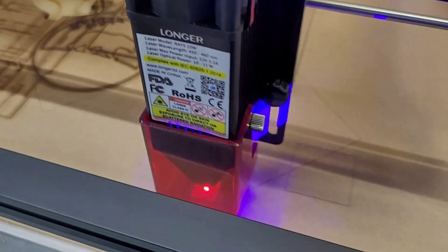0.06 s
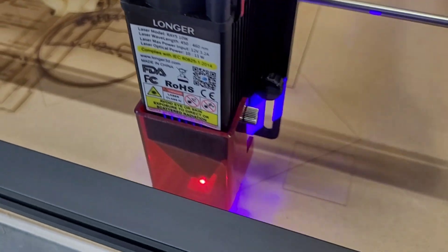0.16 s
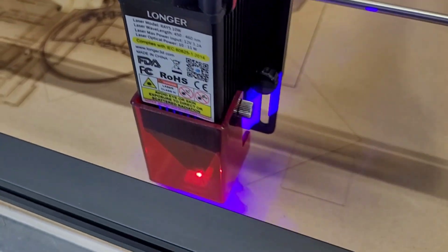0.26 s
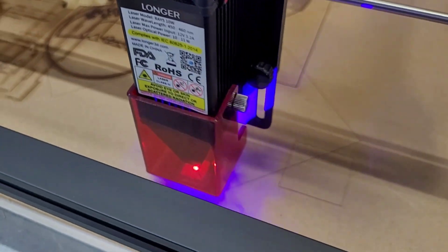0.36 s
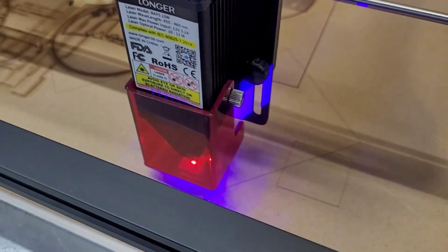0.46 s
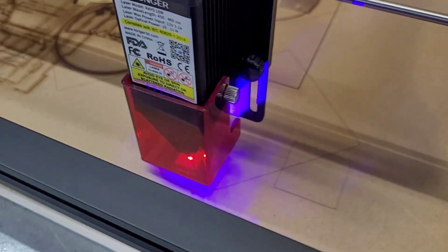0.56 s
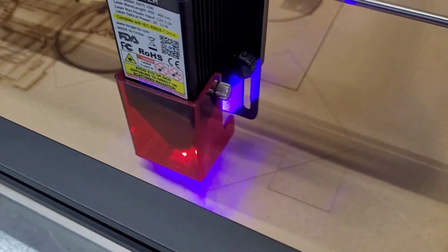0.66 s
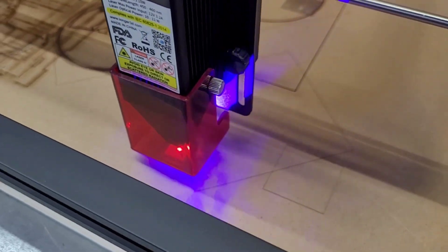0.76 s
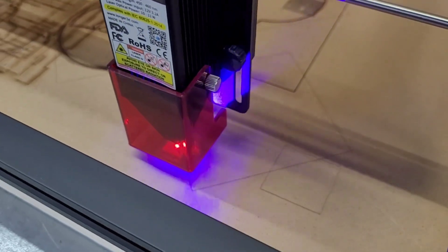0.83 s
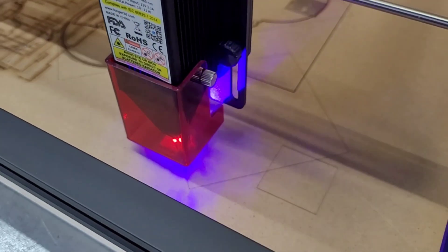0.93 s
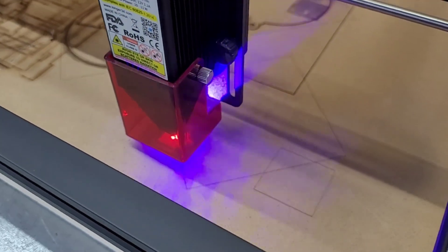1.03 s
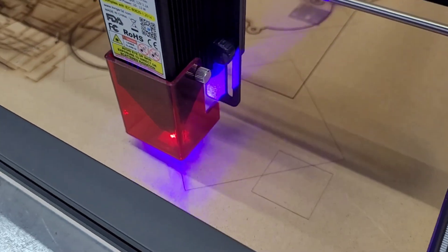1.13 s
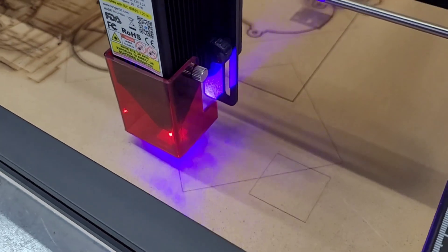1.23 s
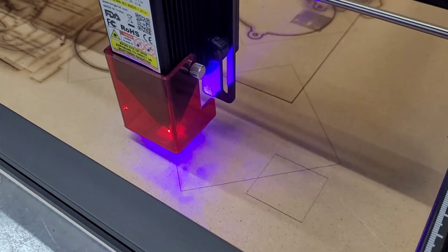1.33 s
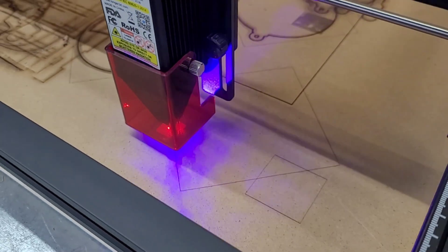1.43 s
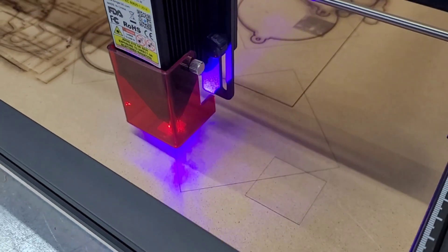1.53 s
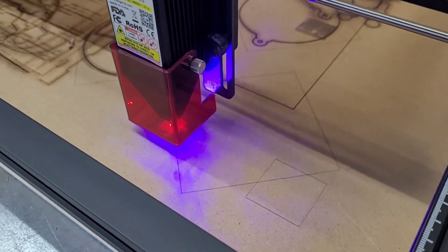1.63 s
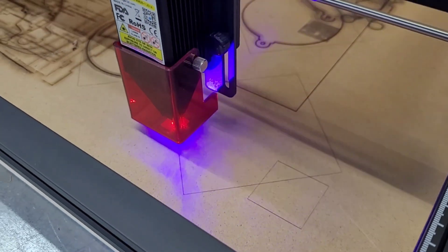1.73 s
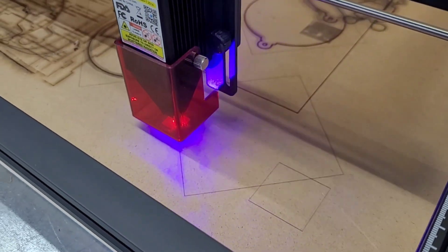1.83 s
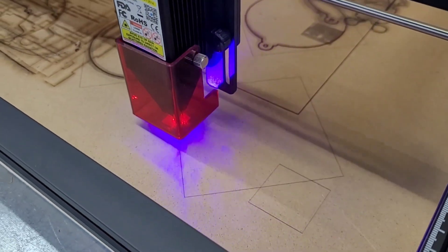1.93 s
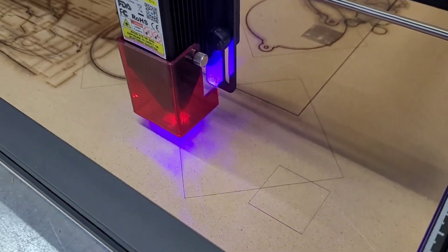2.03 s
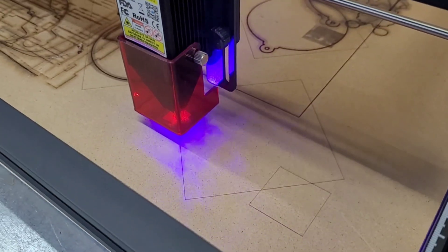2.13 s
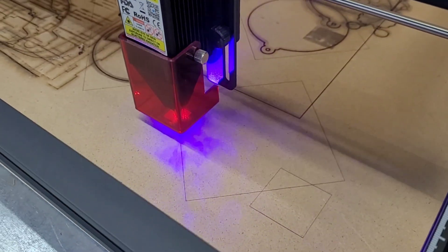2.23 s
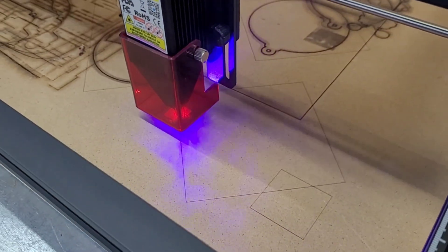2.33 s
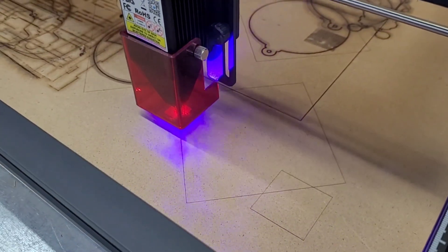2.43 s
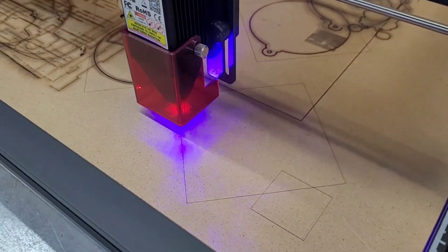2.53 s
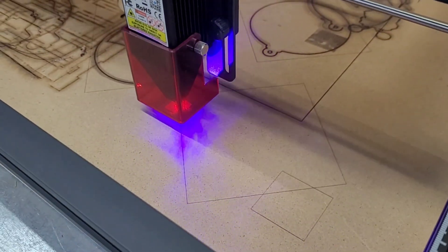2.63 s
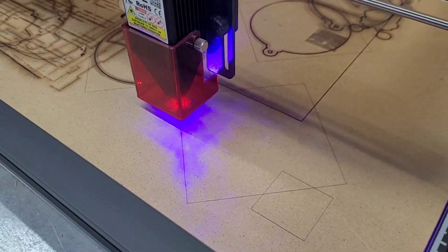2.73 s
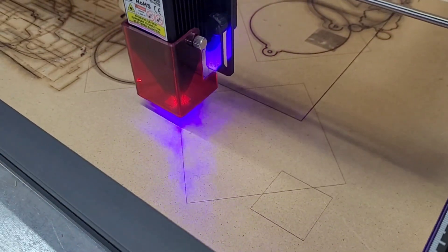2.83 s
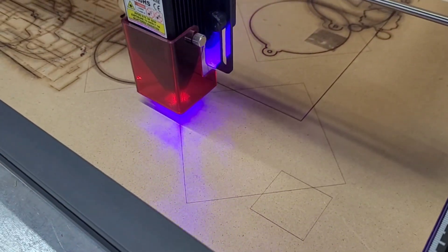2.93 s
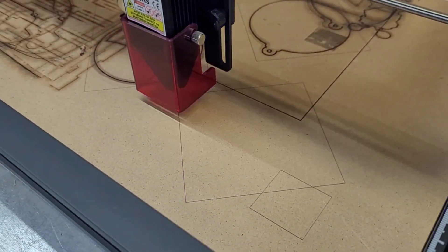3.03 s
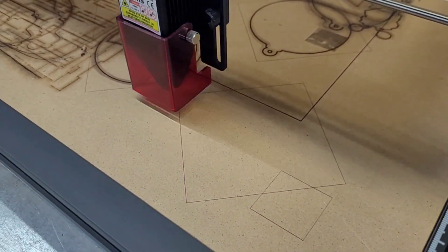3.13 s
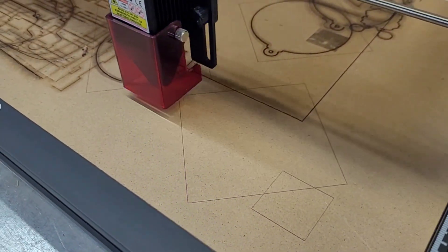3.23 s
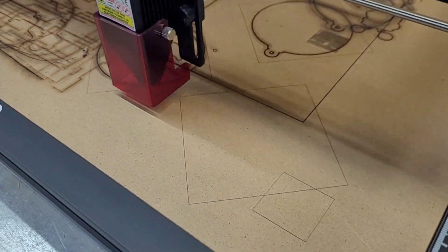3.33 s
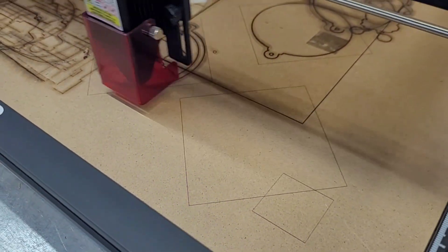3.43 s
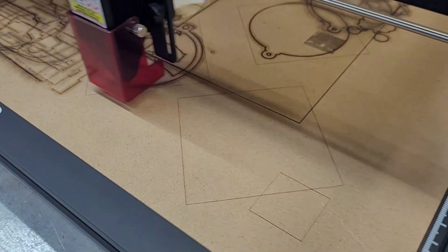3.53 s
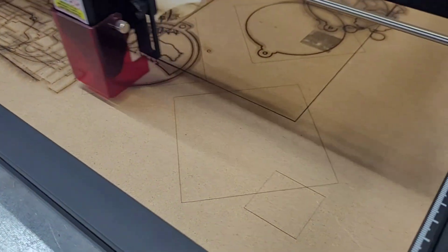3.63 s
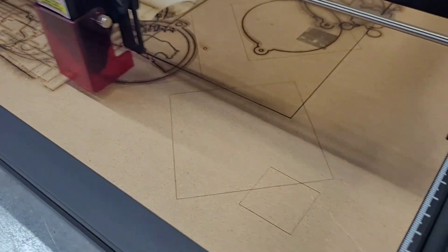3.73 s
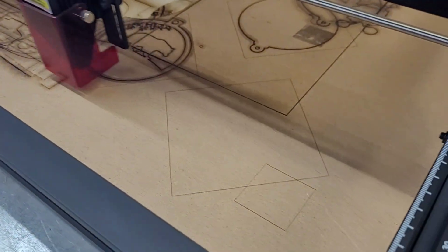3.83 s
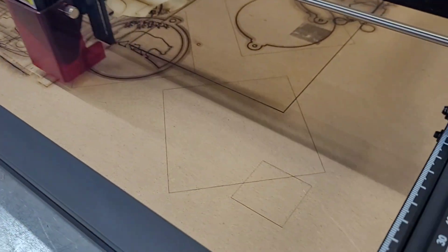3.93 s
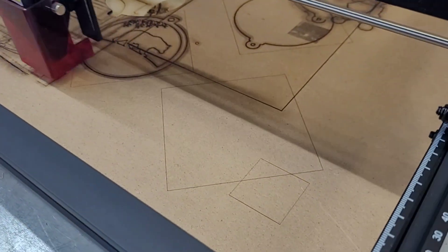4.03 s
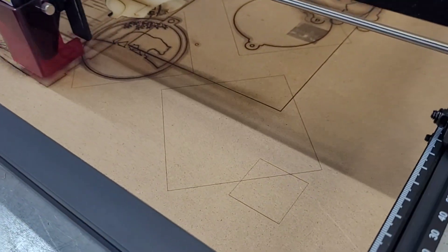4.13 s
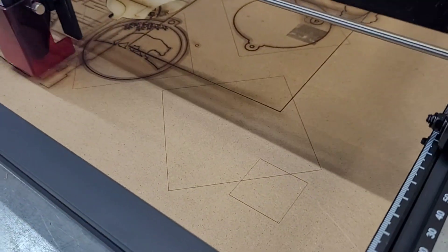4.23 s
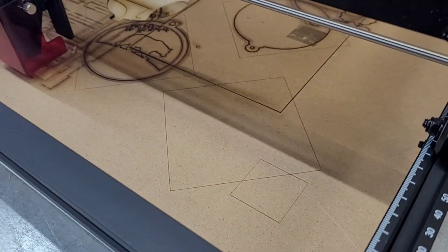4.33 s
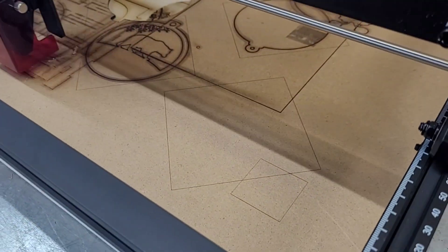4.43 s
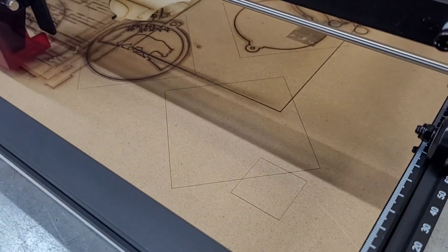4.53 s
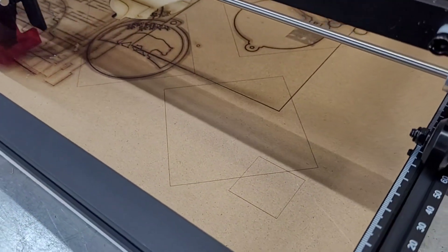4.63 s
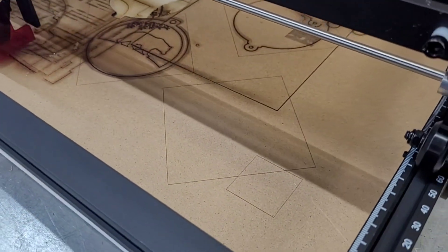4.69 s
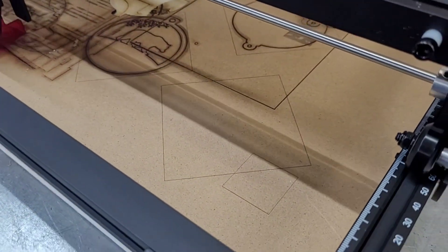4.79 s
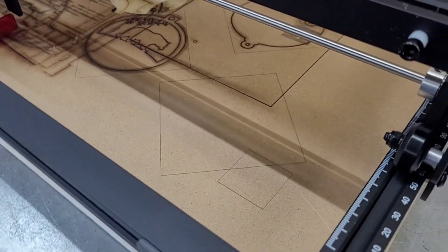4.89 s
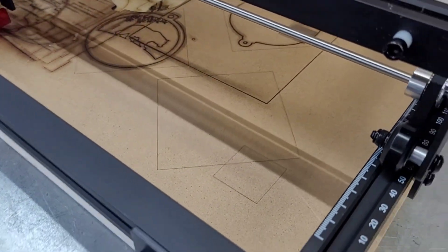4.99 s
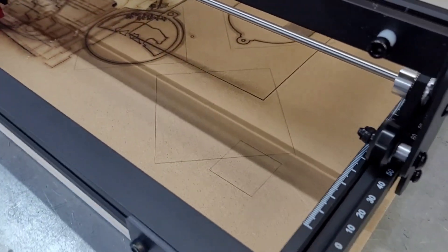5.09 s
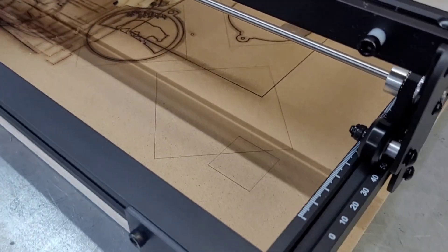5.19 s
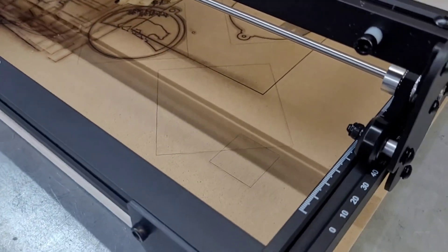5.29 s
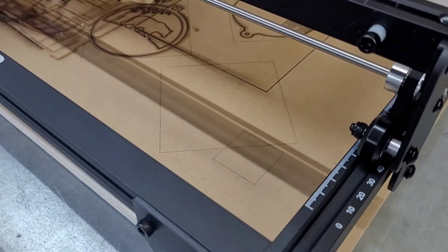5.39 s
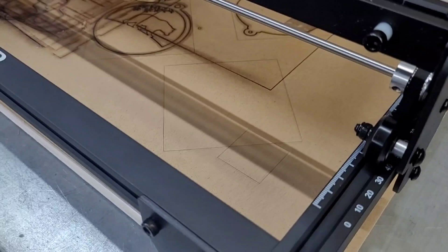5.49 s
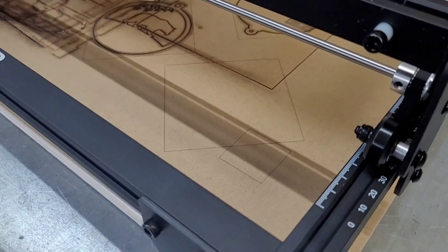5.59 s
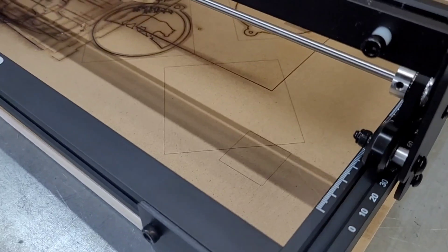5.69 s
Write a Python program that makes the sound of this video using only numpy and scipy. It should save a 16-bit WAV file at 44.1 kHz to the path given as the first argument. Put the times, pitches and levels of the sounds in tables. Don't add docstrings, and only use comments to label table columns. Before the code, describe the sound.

From 0 to 3.1 seconds a small laser engraver cuts wood very close to the microphones. A loud, steady, piercing whine sits around 1 kHz with strong overtones at 2 and 3 kHz, grainy and buzzing, slightly stronger at the start with brief flares in the first third of a second. Burning hiss, fan rush and two closely tuned motors singing near 1.7 kHz surround it; the tone shifts subtly between left and right. A dull knock lands at 1.8. At 3.1 the whine cuts off abruptly. Between 3.1 and 3.4 the carriage brakes and reverses: a clunk with a dry click, a tick and rapid gliding motor chirps. Afterwards, far quieter, a low hum with a thin motor tone and airy friction rush continues, its rush gently fading. Small clicks come at 4.9, 5.08 and 5.13, a low knock and sharp tick near 5.6, and a brief downward motor slur at 5.7.

```python
import sys
import numpy as np
from scipy import signal
from scipy.fft import rfft, irfft, next_fast_len
from scipy.io import wavfile

SR = 44100
rng = np.random.default_rng(int(sys.argv[2]) if len(sys.argv) > 2 else 0)


def elevation(decibels):
    levels = np.asarray(decibels, float)
    return 10 ** (levels / 20)


def store_wav(level_fs):
    pcm = np.round(np.clip(np.atleast_2d(level_fs), -1, 1) * 32767)
    wavfile.write(sys.argv[1], SR, pcm.T.astype(np.int16))


N = 253575
T = np.arange(N) / SR

PULSE_HZ = 1001.53
BEAM_OFF_S, FULL_SPEED_S = 3.11, 3.36

# frequency in Hz, left level in dB, right level in dB, left phase lead in rad.
MAINS_TONES = [(119.8, -64, -63, 0.2), (240.2, -62, -61, 0.0)]
# frequency in Hz, left dB, right dB, left lead in rad.
CUT_MACHINE_TONES = [(53.2, -73, -67, 0.4), (105.6, -61, -63, 0.2), (212.6, -65, -62, -0.2),
                     (316.9, -48, -51, 0.2), (345.2, -59, -64, 0.4), (493.9, -62, -69, 0.6),
                     (640.6, -57, -53, 0.5), (1604.9, -60, -67, -1.1), (1922.5, -53, -58, 1.8),
                     (3382.1, -59, -66, 1.1), (3403.6, -59, -70, 3.0), (5073.1, -63, -61, 2.6),
                     (5105.4, -57, -68, 1.1), (6807.2, -71, -60, 2.2), (8508.3, -66, -65, 0.3),
                     (10210.1, -65, -74, -2.2)]
# frequency in Hz, left dB, right dB, left lead in rad.
HOME_MACHINE_TONES = [(144.7, -61, -58, -0.2), (288.7, -67, -69, -2.8), (366.7, -61, -68, 1.5),
                      (499.3, -62, -72, 0.9), (558.5, -62, -63, 1.4), (654.7, -61, -55, 1.1),
                      (432.8, -66, -67, 0.5), (578, -65, -66, 0.8), (998.6, -57, -57, 2.35),
                      (1364.0, -62, -71, 2.8), (1588.1, -61, -71, -0.7), (1964.2, -59, -77, -1.7),
                      (2165.4, -59, -64, 1.2), (2496.5, -64, -74, 0.2), (3031.5, -67, -75, 1.3)]
# frequency in Hz, left dB, right dB, left lead in rad.
HOME_WHISTLE_TONES = [(4619.5, -67, -74, -2.0), (4802.6, -77, -82, 0.5), (6929.7, -77, -70, 1.3),
                      (6992.9, -81, -72, -1.8), (9057.4, -78, -84, -0.7), (11294.8, -81, -84, 0.4),
                      (11366.8, -79, -82, 0.5), (13604.9, -69, -79, -2.2), (13677.6, -70, -86, -2.6),
                      (15359.9, -76, -87, 2.3)]

# time in seconds, share of full speed (0-1).
CUT_SPEED_CURVE = [
    (0, 1),
    (3.09, 1),
    (3.19, .2),
]
# time in seconds, share of full speed (0-1).
HOME_SPEED_CURVE = [
    (3.2, .1),
    (3.36, 1),
    (5.7, 1),
    (5.75, .88),
]

# frequency in Hz, left dB per Hz, right dB per Hz, likeness of the ports (0-1),
# left lead in rad.
CUT_NOISE_SPECTRUM = [(30.2, -89, -100, 0.6, 4.5), (101, -83, -87.5, 0.97, 0.2), (250, -78, -77, 0.71, 1),
                      (696, -77, -79, 0.73, 0.84), (1530, -70, -71, 1, 2.5), (2038, -61, -75, 1, 1.62),
                      (2286, -71.5, -73.5, 0.45, 3.5), (2890, -73.5, -83.5, 0, 2.5),
                      (4620, -89.5, -86.5, 0.3, 4.5), (4800, -77.5, -86, 0.26, 4), (7360, -92, -78, .4, 5),
                      (8900, -85.5, -92, 0.05, 5.5), (12600, -82, -81, 0.4, 11),
                      (15900, -78, -91, 0.3, 12.5)]
# frequency in Hz, left dB per Hz, right dB per Hz, likeness of the ports (0-1),
# left lead in rad.
HOME_NOISE_SPECTRUM = [(30, -77, -77, .8, -3), (59.6, -75.5, -88, .9, 1), (187, -82, -79.5, 0.8, -0.6),
                       (395, -81, -80, 0.6, 1.62), (860, -80.5, -82.5, 1, 1.4),
                       (1190, -81.5, -80.5, 0.73, 3), (1286, -70.5, -76.5, 0.63, 3),
                       (1634, -76.5, -82, 0.69, 3.5), (2174, -69, -84.5, 0.47, 3),
                       (3230, -84.5, -89.5, 0.072, 5.5), (4020, -88, -89.5, 0.47, 8),
                       (9900, -99, -101, 0.071, 17.5), (13700, -96, -100, 0.32, 23),
                       (15500, -93, -105, .2, 7)]

# multiple of the pulse rate, level in dB, echo share (0-1),
# echo lag at the start in turns, slip in turns per s.
BEAM_AT_LEFT = [(1, -38.0, 0.14, 0.73, 0.4), (2, -31.1, 0.36, 0.39, 0.35), (3, -38.2, 0.45, 0.18, 0.42),
                (4, -62.6, 0.39, 0.11, 0.39), (5, -54.2, 0.39, 0.83, 0.88), (6, -58.1, 0.35, 0.7, 0.3),
                (7, -59.3, 0.9, 0.79, 0.18), (8, -62.4, 0.64, 0.91, 0.25), (9, -66.7, 0.9, 0.93, 0.19),
                (10, -63.7, 0.59, 0.48, -1.03), (11, -65.4, 0.49, 0.03, 1.39),
                (12, -59.2, 0.76, 0.39, 0.14), (13, -45.9, 0.9, 0.36, 0.08), (14, -50.6, 0.47, 0.38, 0.22),
                (15, -59.6, 0.27, 0.95, 0.77)]
# level in dB, echo share (0-1), echo lag at the start in turns,
# slip in turns per s, left lead in rad.
BEAM_AT_RIGHT = [(-35.4, 0.42, 0.38, 0.12, 0.8), (-28.7, 0.9, 0.37, 0.05, 2.4),
                 (-31.1, 0.85, 0.48, 0.02, 1.8), (-61.4, 0.51, 0.35, 0.27, 1.3),
                 (-58.0, 0.38, 0.64, 0.92, -0.4), (-54.1, 0.71, 0.18, 0.55, -1.6),
                 (-47.6, 0.24, 0.18, 0.4, -1.3), (-63.7, 0.9, 0.76, -0.11, -2.8),
                 (-65.1, 0.53, 0.17, -0.3, 0.4), (-62.5, 0.63, 0.84, 1.34, 1.4),
                 (-57.6, 0.63, 0.34, 0.17, -1.8), (-57.2, 0.14, 0.63, 1.08, -1.7),
                 (-58.7, 0.9, 0.79, -0.26, -0.9), (-60.2, 0.48, 0.59, -0.33, -1.8),
                 (-66.7, 0.5, 0.63, 1.24, -1.0)]
# frequency in Hz, level in dB, echo share (0-1),
# echo lag in turns, slip in turns per s.
STEPS_AT_LEFT = [
    (1691, -42.3, 0.19, 0.62, -0.46),
    (1701.8, -49.6, 0.9, 0.72, 0.25),
]
# level in dB, echo share (0-1), echo lag in turns, slip in turns per s,
# left lead in rad.
STEPS_AT_RIGHT = [
    (-49.5, 0.65, 0.59, -0.13, -0.0),
    (-55.6, 0.58, 0.11, 0.51, 3.1),
]
# frequency in Hz, level in dB, echo share (0-1), echo lag in turns,
# slip in turns per s.
HOME_AT_LEFT = [
    (2310, -50.0, 0.52, 0.02, -0.63),
    (72, -49.4, 0.23, 0.87, 0.86),
    (249.7, -47.4, 0.9, 0.44, 0.03),
]
# level in dB, echo share (0-1), echo lag in turns, slip in turns per s,
# left lead in rad.
HOME_AT_RIGHT = [
    (-58.9, 0.6, 0.58, -0.86, 0.1),
    (-48.3, 0.2, 0.87, 0.85, 0.4),
    (-54.5, 0.9, 0.73, -0.08, -2.2),
]

# start in seconds, length in seconds, from Hz, to Hz, peak in
# dB.
RAMP_SWEEPS = [(3.103, 0.083, 320, 335, -45), (3.174, 0.054, 345, 305, -43.5),
               (3.223, 0.128, 250, 382, -44), (3.244, 0.041, 604, 700, -42.5),
               (3.27, 0.064, 723, 1060, -45), (3.097, 0.127, 660, 612, -46.5),
               (3.115, 0.074, 2020, 1795, -46), (3.174, 0.069, 700, 1100, -51),
               (3.295, 0.092, 620, 660, -51), (3.245, 0.099, 1530, 2495, -46.5),
               (5.705, .07, 870, 600, -52), (5.726, 0.056, 392, 310, -41)]
# time in seconds, peak in dB, mode in Hz, t60 in seconds, left-right in dB.
FRAME_KNOCKS = [
    (1.809, -19.5, 455, 0.016, -7),
    (3.158, -29.5, 328, 0.065, 8),
    (3.167, -29.5, 463, 0.049, -1),
    (3.274, -37.5, 5460, 0.066, -5),
    (3.27, -40, 1850, 0.07, 9),
    (3.276, -42, 3900, 0.094, 3),
    (5.079, -51, 280, 0.022, 0),
    (5.584, -40, 250, 0.13, -4),
    (5.637, -36, 12500, 0.015, -6),
    (5.637, -40, 7500, 0.013, 3),
]
# time in seconds, peak in dB, from Hz, to Hz, left-right in dB.
DRY_CLICKS = [
    (1.8105, -36, 250, 1600, 0),
    (4.903, -39, 11500, 15000, 3),
    (3.1681, -25, 1900, 5000, 0),
    (3.1683, -37, 5500, 8500, 0),
    (5.0762, -29, 250, 2600, 3),
    (5.1272, -32, 600, 2600, 3),
]
# time in seconds, rise in dB, half width in seconds.
BURN_FLARES = [
    (.135, 5.5, 0.042),
    (.312, 3.5, 0.018),
    (2.8, 1.5, 0.13),
    (3.07, 2.2, .02),
]
# time in seconds, rush rise in dB, half width in seconds, air rise in dB,
# left-right in dB.
CARRIAGE_JOLTS = [
    (3.15, 3, 0.19, 3.5, -6.5),
    (3.27, 4.5, 0.057, 2, -0.5),
    (4.14, -3, 0.022, .3, 7),
    (5.74, 3.5, .05, 2.5, -3),
]


def in_time(rows):
    s, *columns = np.transpose(rows)
    return [np.interp(T, s, c) for c in columns]


def drift(rate):
    step = 40
    r = np.exp(-2 * np.pi * rate * step / SR)
    chance = rng.standard_normal(N // step + 2002)
    slow = signal.lfilter([1], [1, -2 * r, r * r], chance)[2000:]
    return np.interp(np.arange(N) / step, np.arange(len(slow)), slow / slow.std())


def gate(on, off, edge=0.0045):
    return np.clip(np.minimum(T - on, off - T) / edge, 0, 1)


def bumps(rows, axis):
    return sum(row[axis] * np.clip(1 - np.abs(T - row[0]) / row[2], 0, 1) for row in rows)


def tone(turns, left_db, right_db, lead):
    phase = 2 * np.pi * (turns + rng.random())
    left = elevation(left_db) * np.sin(phase + lead)
    right = elevation(right_db) * np.sin(phase)
    return np.sqrt(2) * np.array([left, right])


def panned(turns, db, pan_db, lead):
    mean_over_right = np.abs(elevation(pan_db) * np.exp(1j * lead) + 1) / 2
    right_db = db - 20 * np.log10(mean_over_right)
    return tone(turns, right_db + pan_db, right_db, lead)


def tones(rows, speed, waver_db):
    travel = np.cumsum(speed) / SR
    return sum(elevation(waver_db * drift(5.1)) * tone(hz * travel, left, right, lead) for hz, left, right, lead in rows)


def echoed(turns, left, right, since):
    a, b = [1 + share * np.exp(2j * np.pi * (lag + slip * since)) for _, share, lag, slip in (left, right[:4])]
    lead = right[4] + np.angle(a) - np.angle(b)
    return np.abs([a, b]) * tone(turns, left[0], right[0], lead)


def port_noise(rows, split_hz, grain=1):
    size = next_fast_len(N)
    hz = np.arange(size // 2 + 1) * SR / size + 1e-3
    at, *columns = np.transpose(rows)
    left, right, alike, lead = [np.interp(np.log(hz), np.log(at), c) for c in columns]
    alike = np.clip(alike, 0, 1)
    low = 1 / (1 + (hz / split_hz) ** 4)
    rumble_cut = np.minimum(hz / at[0], 1) ** 2
    white = rng.standard_normal((2, N)) * np.sqrt(SR / 2)
    parts = []
    for share, shape in ((low, 1), (1 - low, grain)):
        one, other = rfft(white * shape, size) * share * rumble_cut
        at_left = elevation(left) * one * np.exp(1j * lead)
        at_right = elevation(right) * (alike * one + np.sqrt(1 - alike ** 2) * other)
        parts.append(irfft(np.array([at_left, at_right]), size)[:, :N])
    return parts


def mains_hum():
    return tones(MAINS_TONES, np.ones(N), waver_db=2.5)


def home_noise():
    since = T - FULL_SPEED_S
    rush, air = port_noise(HOME_NOISE_SPECTRUM, split_hz=4600)
    side_db = np.outer([.3, -.7], bumps(CARRIAGE_JOLTS, axis=4))
    rush_db = -1.34 * (since - 1.1) + bumps(CARRIAGE_JOLTS, axis=1) + side_db + 0.62 * drift(34)
    air_db = -1.2 * (since - 1.3) + bumps(CARRIAGE_JOLTS, axis=3) + 0.91 * drift(17)
    return (rush * elevation(rush_db) + air * elevation(air_db)) * gate(BEAM_OFF_S - .004, 9)


def belt_rasp():
    centre_hz, width_hz = 1960, 180
    edges_hz = [centre_hz - width_hz / 2, centre_hz + width_hz / 2]
    band = signal.butter(2, edges_hz, "band", fs=SR, output="sos")
    noise = signal.sosfilt(band, rng.standard_normal(N))
    level = -48 - 5 * (T - FULL_SPEED_S) + 2.5 * drift(9.7)
    return noise / noise.std() * elevation(level) * gate(FULL_SPEED_S - .1, 9, 0.083) * elevation([[3], [-9]])


def knocks():
    out, t = np.zeros((2, N)), T[:SR // 8]
    for s, db, hz, t60, pan_db in FRAME_KNOCKS:
        noisy = .92 / (1 + (1100 / hz) ** 2)
        band = signal.butter(2, [hz / 1.35, min(hz * 1.35, .45 * SR)], "band", fs=SR, output="sos")
        puff = signal.sosfilt(band, rng.standard_normal(len(t)))
        blow = (1 - noisy) * np.sin(2 * np.pi * hz * t) + noisy * puff / puff.std() * 0.49
        blow *= elevation(db - 60 * t / t60) * np.minimum(t * hz * 2, 1)
        at = round(s * SR)
        out[:, at:at + len(t)] += (blow * elevation([[pan_db / 2], [-pan_db / 2]]))[:, :N - at]
    return out


def clicks():
    out, push = np.zeros((2, N)), -np.eye(1, SR // 50)[0]
    for s, db, low_hz, high_hz, pan_db in DRY_CLICKS:
        band = signal.butter(4, [low_hz, high_hz], "band", fs=SR, output="sos")
        click = signal.sosfilt(band, push)
        at = round(s * SR)
        level = elevation(db + np.array([[pan_db / 2], [-pan_db / 2]]))
        out[:, at:at + len(click)] += click / np.abs(click).max() * level
    return out


def ramp_sweeps():
    attack_s, release_s, sag_db_per_s = 0.015, 0.012, -70
    out = 0
    for s, length, from_hz, to_hz, db in RAMP_SWEEPS:
        hz = np.interp(T, [s, s + length], [from_hz, to_hz])
        shape = gate(s, 9, attack_s) ** 2 * gate(-1, s + length, release_s)
        level = db + sag_db_per_s * np.clip(T - s - attack_s, 0, 1)
        rough = elevation(4.5 * drift(50) - 2) * shape
        uneven = 1 + .03 * drift(70)
        out = out + rough * panned(np.cumsum(hz * uneven) / SR, level, 2.1, 0.24)
    return out


def home_motors():
    speed, = in_time(HOME_SPEED_CURVE)
    travel, since = np.cumsum(speed) / SR, T - FULL_SPEED_S
    main = 0
    for (hz, *left), right in zip(HOME_AT_LEFT, HOME_AT_RIGHT):
        main = main + elevation(1.26 * drift(3.6)) * echoed(hz * travel, left, right, since)
    whistles = tones(HOME_WHISTLE_TONES, speed, waver_db=2.5) * elevation(-4 * (T - 4.2))
    frame = tones(HOME_MACHINE_TONES, speed, waver_db=1.0) * elevation(0.3)
    return (main + whistles + frame) * gate(3.33, 9, .03)


def cutting_motors():
    speed, = in_time(CUT_SPEED_CURVE)
    steps = 0
    for (hz, *left), right in zip(STEPS_AT_LEFT, STEPS_AT_RIGHT):
        steps = steps + elevation(0.45 * drift(4)) * echoed(hz * T, left, right, T)
    frame = tones(CUT_MACHINE_TONES, speed, waver_db=1.44)
    return steps * gate(-1, 3.097, 0.02) + frame * gate(-1, 3.115, 0.0087)


def burn_db():
    start_db, settled_db, settle_s = 3, 0.94, 0.43
    dying_db, dying_s = -4.5, 0.049
    settle = settled_db + (start_db - settled_db) * np.exp(-T / settle_s)
    dying = dying_db * np.clip(1 + (T - BEAM_OFF_S) / dying_s, 0, 1)
    return settle + bumps(BURN_FLARES, axis=1) + dying


def rush_and_hiss(flicker, pulse_db):
    puff_db = 2.7 * np.sin(2 * np.pi * PULSE_HZ * T) + pulse_db
    rush, hiss = port_noise(CUT_NOISE_SPECTRUM, split_hz=2540, grain=elevation(puff_db))
    rush_db = -0.97 * (T - BEAM_OFF_S / 2) + 0.13 * flicker
    hiss_db = flicker + 0.82 * burn_db() - 4.0
    return (rush * elevation(rush_db) + hiss * elevation(hiss_db)) * gate(-1, BEAM_OFF_S + .003)


def beam(flicker, pulse_db):
    comb = 0
    for (k, *left), right in zip(BEAM_AT_LEFT, BEAM_AT_RIGHT):
        shimmer = elevation(.1 * k * drift(25) + .05 * k * drift(3))
        comb = comb + shimmer * echoed(k * PULSE_HZ * T, left, right, T)
    return comb * elevation(0.44 * pulse_db + 0.35 * flicker + burn_db()) * gate(-1, BEAM_OFF_S)


def scene():
    flicker = .5 * drift(17.0) + 1.2 * drift(91)
    strengths = rng.standard_normal(int(T[-1] * PULSE_HZ) + 2)
    pulse_db = 1.65 * np.interp(T * PULSE_HZ + 0.5, np.arange(len(strengths)), strengths)
    background = mains_hum() + home_noise() + belt_rasp()
    carriage = knocks() + clicks() + ramp_sweeps() + home_motors() + cutting_motors()
    return background + carriage + rush_and_hiss(flicker, pulse_db) + beam(flicker, pulse_db)


def low_pass(x):
    return signal.sosfilt(signal.butter(12, 15760, fs=SR, output="sos"), x)


def record(dry):
    return low_pass(dry)


dry = scene()
out = record(dry)
store_wav(out)
```